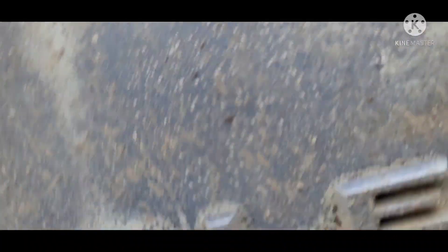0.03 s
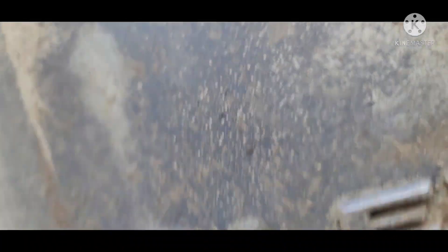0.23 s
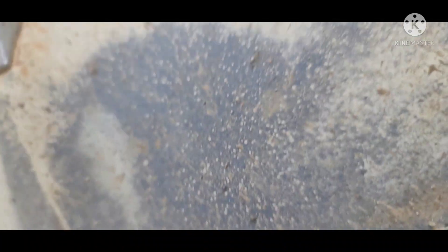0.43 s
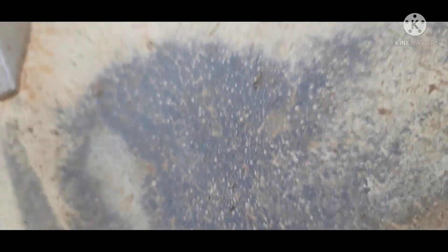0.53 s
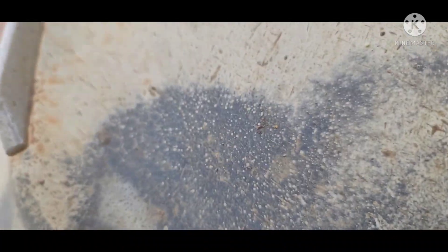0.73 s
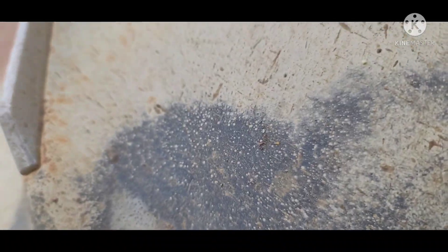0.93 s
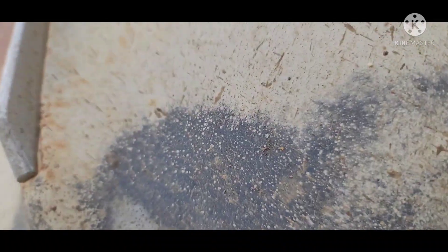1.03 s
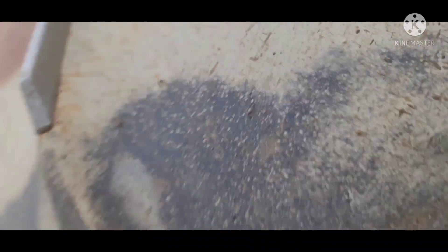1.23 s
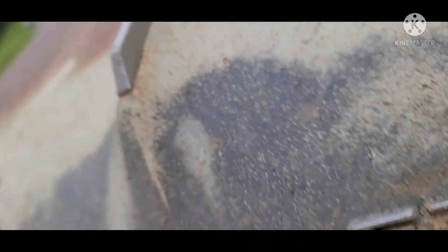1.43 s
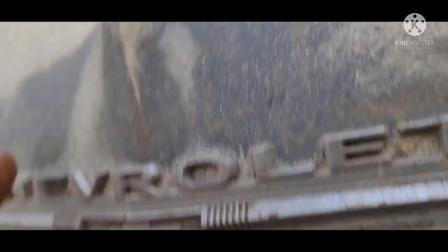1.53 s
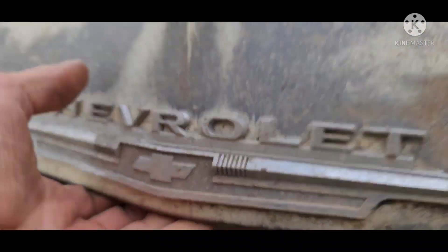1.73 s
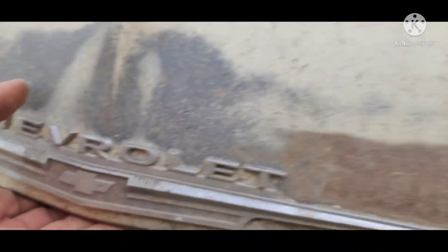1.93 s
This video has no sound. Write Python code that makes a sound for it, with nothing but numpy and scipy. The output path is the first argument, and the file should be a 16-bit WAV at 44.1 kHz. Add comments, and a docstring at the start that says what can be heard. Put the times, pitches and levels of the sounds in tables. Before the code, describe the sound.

An old truck hood is popped open: deep hollow panel boom with a brief dry squeak, a sharp catch snap midway, then scrapes and a cluster of clattering clicks, close to a stereo microphone in a hard-walled yard.

```python
"""An old truck's steel hood is popped open, close to the microphones, in a hard-walled yard.
Blows set the panel booming with decaying modes, dying noise and a dull thump.
The dry latch squeaks as a noisy stick-slip tone, and the catch snaps back with a crack and a ring.
Then the metal scrapes and rattles, in shaped noise bursts, as the hood is taken by its front edge.
Contacts ring a bracket and echo in the yard, over quiet air and a thin whine."""
import sys
import numpy as np
from scipy import signal
from scipy.fft import rfft, irfft, next_fast_len
from scipy.io import wavfile

SR = 44100
rng = np.random.default_rng(int(sys.argv[2]) if len(sys.argv) > 2 else 0)


def persist_wave(psi):
    """Save psi, clipped to +-1, as 16-bit WAV."""
    counts = np.round(np.clip(psi, -1, 1) * 32767).astype(np.int16)
    wavfile.write(sys.argv[1], SR, np.atleast_2d(counts).T)


N = 88200  # two seconds of samples

# Blows that shake the hood. Each row: start in seconds, shudder, panel boom and thump levels in dB,
# treble tilt of the shudder in dB per octave above 150 Hz.
HOOD_BLOWS = [(0.077, -44, -55.5, -38, 2), (.155, -20.5, -27.5, -16, 0.5), (.192, -26, -26.5, -13.5, -.5),
              (.226, -27, -25, -12, 0.5), (.315, -34, -26.5, -23, -1.5), (.408, -34.5, -29, -51, -2.5),
              (0.835, -34.5, -46, -56, 0.5), (1.035, -55, -46, -58, -3), (1.089, -51, -52, -36, 1.5),
              (1.266, -39, -47, -54, 2), (1.305, -43, -35.5, -52, 4), (1.360, -32, -31.5, -38, 0.5),
              (1.396, -36, -40, -47, 1), (1.535, -39, -40.5, -35, -1), (1.605, -42, -39.5, -40, 0),
              (1.715, -42, -44, -37, -2), (1.885, -48, -49, -52, -7)]
# Boom of the hood panel. Each row: frequency in Hz, level in dB, t60 in seconds.
HOOD_MODES = [(41.5, -12.5, 0.41), (74.6, -9.5, 0.48), (105.56, -0.5, 0.6), (116.9, 2, 0.75),
              (136.34, -6.5, 0.93), (191, -10, 0.91), (211.4, -12.5, 1.45), (283.2, -11, 1.03),
              (375.2, -12, 0.91), (399, -12.5, 0.95), (472.5, -12.5, 0.93), (518.5, -12.5, 0.4),
              (564, -11.5, 1.06)]
# The hood's dense higher modes, heard as a shudder. Each row: frequency in Hz, relative dB per Hz.
SHUDDER_COLOUR = [(18, -45), (40, -14), (70, 0), (125, -2.5), (175, -8), (300, -8.5), (520, -11),
                  (800, -15), (1300, -20.5), (2500, -32), (5000, -42), (9000, -53), (16000, -52)]
# How fast the shudder dies. Each row: frequency in Hz, t60 in seconds.
SHUDDER_T60 = [(40, 0.97), (120, 1.75), (300, 1.21), (700, 1.17), (1500, 0.94), (4000, 0.88), (14000, 0.47)]
# Dull thump of the whole hood on its hinges. Each row: frequency in Hz, level in dB, t60 in seconds.
THUMP_MODES = [(47.7, -7.5, 0.14), (67.8, -4.5, 0.12), (195, -14, 0.085), (494, -13, 0.037)]
HOOD_RISE_S = 0.0091

# Knocks of the hood's front edge. Each row: start in seconds, level in dB.
EDGE_KNOCKS = [(.160, -21.5), (1.366, -32.5), (1.398, -27)]
# Ring of the front edge. Each row: frequency in Hz, level in dB, t60 in seconds.
EDGE_MODES = [(523, 0, 0.21), (592, -9.5, 0.21), (665, -4, 0.1), (834, -6, 0.2)]

# Stick-slip squeak of the latch. Each row: time in seconds, pitch in Hz, base level in dB.
SQUEAK_CURVE = [(.084, 1052, -59), (.099, 1010, -52), (.105, 962.5, -34.5), (.117, 981, -31.5),
                (.138, 966.5, -24), (.145, 963, -20.5), (.156, 946, -18.5), (.168, 923.6, -24),
                (.186, 926.7, -39.5), (.206, 949, -25), (.222, 920, -44)]
# Short chirp before the rattle. Each row: time in seconds, pitch in Hz, base level in dB.
CHIRP_CURVE = [(1.212, 2015, -66), (1.229, 2020, -40), (1.238, 2020, -44.5), (1.256, 2030, -45)]
# Strength of the squeak's harmonics. Each entry: level in dB, from the fundamental up.
SQUEAK_PARTIALS_DB = [7, -3, -13, -21, -33]
# Friction noise under the squeak. Each row: frequency in Hz, relative dB per Hz.
FRICTION_COLOUR = [(200, -34), (600, -18), (800, 2), (1100, 6), (1450, -6), (1850, -16), (2300, -13),
                   (2900, -5), (3400, -22), (3800, -23), (5000, -17), (14000, -30)]
FRICTION_DB = -19  # against the squeak's base level
PITCH_JITTER, LEVEL_FLUTTER = 0.014, 0.22  # rms, as fractions
BRIGHTENING = 0.22  # dB per dB of level, for each step up the harmonics
PHASE_SWAY, PHASE_BLUR = 0.22, 0.102  # rms radians: for every partial, and per step up the harmonics
SQUEAK_LEAD = 0.667  # lead at the left port, in cycles of the fundamental
BITE_AT_S, BITE_S, BITE_DB = 0.1438, 0.0045, 3.5  # the latch bites hardest; boost per harmonic step

# The catch snapping back. Two entries: start in seconds, level of its ring in dB.
CLUNK = (.8345, -25)
# Ring of the catch. Each row: frequency in Hz, level in dB, t60 in seconds.
CATCH_MODES = [(133.6, -3.5, 0.56), (306, -7.5, 0.48), (377.5, -10, 0.42), (704, -2.5, 0.21),
               (796, -5.5, 0.25), (1095, -5.5, 0.19), (1253, 1, 0.13), (1326, -5, 0.15), (1394, -11, 0.21),
               (1830, -10, 0.11), (1942, -2, 0.14), (2000, -8.5, 0.16), (2404, -15, 0.12), (3000, -10, .14)]
# Colour of the catch's crack. Each row: frequency in Hz, relative dB per Hz.
CRACK_COLOUR = [(60, 1), (300, -5.5), (800, -4.5), (1300, 5), (2000, -3.5), (3000, -6), (5500, -14.5),
                (8000, -16), (9800, -26.5), (13500, -20), (16000, -40)]
CRACK_DB, CRACK_T60_S = -16, 0.073
CATCH_LAG_S = 0.00018  # the ring is late at the right port

# Snaps of the latch spring. Each row: start in seconds, level in dB.
SPRING_SNAPS = [(.222, -21), (0.2513, -29), (0.282, -40), (.358, -28), (.376, -35), (1.306, -21),
                (1.314, -13)]
# Colour of the spring snaps. Each row: frequency in Hz, relative dB per Hz.
SPRING_COLOUR = [(500, -17), (3000, -5.5), (8000, -5), (9500, -8), (14000, 0)]
SPRING_T60_S = 0.014

# Latch parts clicking together. Each row: start in seconds, clank, ring and tick levels in dB.
CLICKS = [(0.142, -34, -36, -37.5), (0.162, -26, -54, -50), (0.181, -33, -34.5, -57),
          (0.221, -30, -26, -28), (0.359, -38, -38.5, -39.5), (0.4169, -38, -52.5, -52),
          (0.432, -35, -63.5, -48), (0.486, -36.5, -51, -79), (0.574, -44, -63, -62),
          (1.228, -35, -67, -70), (1.2633, -23.5, -27, -39), (1.3091, -30, -24.5, -13.5),
          (1.3591, -20.5, -41, -23.5), (1.3915, -24, -29, -18), (1.399, -21.5, -31.5, -32),
          (1.412, -24, -37, -49), (1.4617, -30.5, -32.5, -28), (1.527, -34, -37, -32.5),
          (1.5617, -36.5, -37.5, -30.5), (1.7843, -42, -50.5, -42)]
# Low, hard part of a click. Each row: frequency in Hz, relative dB per Hz.
CLANK_COLOUR = [(100, 6), (350, -0.5), (700, 2), (1000, 0), (1350, 3), (2000, -1), (3000, -12.5),
                (6000, -32), (16000, -60)]
# Bright part of a click. Each row: frequency in Hz, relative dB per Hz.
RING_COLOUR = [(300, -32), (1800, -2.5), (3100, 1.5), (4500, 0.5), (5800, -4.5), (7600, -2.5),
               (9000, -14.5), (16000, -27)]
# Thin top of a click, also the hiss of a scrape. Each row: frequency in Hz, relative dB per Hz.
TICK_COLOUR = [(1000, -31), (6000, -9.5), (7800, -0.5), (9600, -15.5), (10800, -3), (12200, -5.5),
               (14000, 1), (15200, -5), (16000, -22.5)]
# Thin steel rung by every click. Each row: frequency in Hz, dB against the ring level, t60 in seconds.
LEVER_MODES = [(1268, -16, .2), (1852, -14, 0.13), (2853, -13, 0.14), (3355, -16.5, 0.085),
               (6770, -19, 0.147), (7600, -12.5, 0.11)]
CLANK_T60_S, RING_T60_S, TICK_T60_S = 0.076, 0.069, 0.046
CONTACT_RISE_S, CHATTER = 0.0024, 0.48  # chatter is the grit of a burst
SNAP_GAIN, SNAP_S = 0.45, 0.0023  # extra gain of the harder start, and its decay

# Metal sliding on metal. Each row: start in seconds, length in seconds, rasp and hiss levels in dB.
SCRAPES = [(0.127, 0.07, -39, -50), (0.539, 0.084, -70, -66.5), (0.684, 0.058, -72, -55),
           (0.813, 0.044, -45.5, -65), (1.074, 0.068, -39, -40), (1.169, 0.043, -54, -57),
           (1.225, 0.08, -46, -53.5), (1.315, 0.2, -50, -56), (1.532, 0.063, -43, -51),
           (1.593, 0.25, -63.5, -62), (1.683, 0.035, -51, -50), (1.788, 0.058, -63.5, -79),
           (1.83, 0.13, -70, -74), (1.946, 0.091, -64, -64.5)]
# Colour of the rasp. Each row: frequency in Hz, relative dB per Hz.
RASP_COLOUR = [(150, -33), (550, 6.5), (1000, -2), (1700, -4.5), (3500, 1.5), (5500, -5), (7500, 0.5),
               (9500, -13), (16000, -42)]
SCRAPE_RISE_S, SCRAPE_FALL_S, SCRAPE_GRIT = 0.024, 0.013, 0.26

# Dense short resonances of the latch bracket. Each row: frequency in Hz, relative strength in dB.
BRACKET_COLOUR = [(200, -32), (600, -2.5), (1500, -1), (4000, 2.5), (8000, -3), (16000, -1.5)]
BRACKET_DB, BRACKET_T60_S = -1, 0.066  # level is against the direct contact

# How fast the yard echo dies. Each row: frequency in Hz, t60 in seconds.
YARD_T60 = [(100, 2.1), (1000, 0.1564), (2500, 0.4251), (5000, 0.0249), (9000, 0.2), (15000, 1.7)]
# Colour of the yard echo. Each row: frequency in Hz, relative strength in dB.
YARD_COLOUR = [(100, -10.5), (1000, 0), (2500, -11), (5000, -3.5), (9000, -18), (15000, -32)]
YARD_DB, YARD_RISE_S = -12, 0.028
SQUEAK_SEND_DB = -5.5  # how much squeak reaches the yard

# Colour of the outdoor air. Each row: frequency in Hz, relative dB per Hz.
AIR_COLOUR = [(18, -40), (40, -0.5), (130, 0), (400, -11.5), (1000, -18.5), (2000, -24), (4000, -32),
              (9000, -38), (15000, -40)]
# Slow swells of the whine. Each row: time in seconds, dB against the whine level.
WHINE_FADE = [(0, -3), (.63, -1.5), (.8, -9), (1.04, 1), (1.3, -20)]
AIR_DB, WHINE_HZ, WHINE_DB = -55.5, 2290, -69

# Likeness of noise at the two ports. Each row: frequency in Hz, likeness from 0 to 1.
LIKENESS = [(60, 0.68), (140, 0.98), (280, 0.19), (600, 0.37), (1100, 0.5), (2500, 0.066)]
# Balance of the microphone pair. Each row: frequency in Hz, left minus right in dB.
BALANCE_DB = [(50, -3.5), (130, 0), (280, -2), (600, -6.5), (1100, -1.5), (2200, -3), (4500, 1),
              (14000, -2.5)]
# Lag of the left port. Each row: frequency in Hz, lag in seconds.
PORT_LAG_S = [(120, -0.00027), (350, 0.00045)]
TOP_HZ = 15600  # upper band limit


def amp(db):
    """Turns decibels into gain."""
    return 10 ** (np.asarray(db) / 20)


def unit(x):
    """Scales to rms 1."""
    return x / np.sqrt(np.mean(x ** 2) + 1e-20)


def read(points, hz):
    """Reads a table on a log-frequency axis."""
    f, value = np.transpose(points)
    return np.interp(np.log(hz + 1), np.log(f + 1), value)


def clock(size):
    """Time in seconds of each sample."""
    return np.arange(size) / SR


def rise(t, rise_s):
    """Straight ramp up to full level."""
    return np.minimum(t / rise_s, 1)


def decay(t, t60):
    """Exponential fall of 60 dB in t60 seconds."""
    return np.exp(-np.log(1000) * t / t60)


def add(mix, s, sound):
    """Mixes a sound in at time s."""
    part = mix[:, max(round(s * SR), 0):][:, :sound.shape[-1]]
    part += sound[..., :part.shape[1]]


def waver(rate_hz, size):
    """Smooth random movement of rms 1, with little motion faster than rate_hz."""
    hz = np.fft.rfftfreq(size, 1 / SR)
    smooth = rfft(rng.standard_normal(size)) / (1 + (hz / rate_hz) ** 4)
    return unit(irfft(smooth, size))


def noise(spectrum, size, tilt_db=0, grit=0):
    """Coloured noise at both ports, partly alike; grit clumps it into tiny contacts."""
    hz = np.fft.rfftfreq(size, 1 / SR)
    clumps = np.exp(grit * waver(680, size))
    left, other = rfft(rng.standard_normal((2, size)) * clumps)
    same = np.clip(read(LIKENESS, hz), 0, 1)
    right = same * left + np.sqrt(1 - same ** 2) * other
    tilt = amp(tilt_db * np.log2(np.maximum(hz / 150, 1)))
    colour = unit(amp(read(spectrum, hz))) * tilt
    return irfft(np.array([left, right]) * colour, size) / irfft(left, size).std()


def dying(x, t60s):
    """Lets each band die at its own speed."""
    hz, t, bands = signal.stft(x, SR, nperseg=256)
    fall = amp(-60 * t / read(t60s, hz)[:, None])
    return signal.istft(bands * fall, SR, nperseg=256)[1][:, :x.shape[1]]


def modes(table, size):
    """A struck part rings as decaying sines, with alternating signs."""
    t = clock(size)
    ring = np.zeros(size)
    for k, (hz, db, t60) in enumerate(table):
        ring += (-1) ** k * amp(db) * decay(t, t60) * np.sin(2 * np.pi * hz * t)
    return ring


def burst(spectrum, t60):
    """A harder snap starts a chattering contact that dies quickly."""
    t = clock(8192)
    snap = 1 + SNAP_GAIN * np.exp(-t / SNAP_S)
    shape = rise(t, CONTACT_RISE_S) * snap * decay(t, t60)
    return noise(spectrum, size=len(t), grit=CHATTER) * shape


def hood():
    """Each blow pushes the big panel and sets it booming and shuddering."""
    out, t = np.zeros((2, N)), clock(65536)
    boom = modes(HOOD_MODES, size=len(t))
    thump = modes(THUMP_MODES, size=len(t))
    for s, shudder_db, boom_db, thump_db, tilt_db in HOOD_BLOWS:
        shudder = dying(noise(SHUDDER_COLOUR, size=len(t), tilt_db=tilt_db), SHUDDER_T60)
        blow = amp(shudder_db) * shudder + amp(boom_db) * boom + amp(thump_db) * thump
        add(out, s, rise(t, HOOD_RISE_S) * blow)
    return out


def knocks():
    """The hood's front edge knocks on the latch with a hollow clang."""
    out = np.zeros((2, N))
    clang = rise(clock(SR), CONTACT_RISE_S) * modes(EDGE_MODES, size=SR)
    for s, db in EDGE_KNOCKS:
        add(out, s, amp(db) * clang)
    return out


def squeak(curve, partials_db):
    """Stick-slip tone over friction noise; it brightens with force and its partials are unsteady."""
    s, hz, db = np.transpose(curve)
    t = s[0] + clock(8192)
    size = len(t)

    def both(rate_hz):
        """Separate wavering for each port."""
        return np.array([waver(rate_hz, size), waver(rate_hz, size)])

    pitch = np.interp(t, s, hz) * (1 + PITCH_JITTER * waver(134, size))
    turns = np.cumsum(pitch) / SR + np.array([[SQUEAK_LEAD], [0]])
    bite_db = BITE_DB * np.exp(-((t - BITE_AT_S) / BITE_S) ** 2)
    level_db = np.interp(t, s, db, right=-120)
    tone = np.zeros((2, size))
    for k, part_db in enumerate(partials_db):
        bright_db = BRIGHTENING * k * (level_db - db.max())
        even_db = k % 2 * k * bite_db  # only even harmonics jump out at the bite
        flutter = 1 + LEVEL_FLUTTER * both(rate_hz=180)
        unsteady = PHASE_SWAY * both(rate_hz=29.0) + PHASE_BLUR * k * both(rate_hz=140)
        wave = np.sin(2 * np.pi * (k + 1) * turns + unsteady)
        tone += amp(part_db + even_db + bright_db) * flutter * wave
    friction = amp(FRICTION_DB) * noise(FRICTION_COLOUR, size)
    out = np.zeros((2, N))
    add(out, s[0], amp(level_db) * (np.sqrt(2) * tone + friction))
    return out


def catch():
    """The sprung catch slams on its stop: a noisy crack, and the modes of its ring."""
    crack, ring = np.zeros((2, N)), np.zeros((2, N))
    s, db = CLUNK
    add(ring, s, amp(db) * rise(clock(SR), CONTACT_RISE_S) * modes(CATCH_MODES, size=SR))
    add(crack, s, amp(CRACK_DB) * burst(CRACK_COLOUR, CRACK_T60_S))
    late_right = np.roll(ring[1], round(CATCH_LAG_S * SR))
    return crack, np.array([ring[0], late_right])


def snaps():
    """The latch spring gives tiny dry snaps of bright noise."""
    out = np.zeros((2, N))
    for s, db in SPRING_SNAPS:
        add(out, s, amp(db) * burst(SPRING_COLOUR, SPRING_T60_S))
    return out


def clicks():
    """Loose latch parts knock together in three noise bands and ring thin steel."""
    out, lever = np.zeros((2, N)), modes(LEVER_MODES, size=SR // 2)
    for s, clank_db, ring_db, tick_db in CLICKS:
        add(out, s, amp(clank_db) * burst(CLANK_COLOUR, CLANK_T60_S))
        add(out, s, amp(ring_db) * burst(RING_COLOUR, RING_T60_S))
        add(out, s, amp(tick_db) * burst(TICK_COLOUR, TICK_T60_S))
        add(out, s, amp(ring_db) * lever)
    return out


def scrapes():
    """Dusty metal slides in short gritty strokes of rasp and hiss."""
    out, t = np.zeros((2, N)), clock(16384)
    for s, length, rasp_db, hiss_db in SCRAPES:
        after = np.maximum(t - length + SCRAPE_FALL_S, 0)  # time since the stroke began to fade
        stroke = rise(t, SCRAPE_RISE_S) * np.exp(-after / SCRAPE_FALL_S)
        rasp = amp(rasp_db) * noise(RASP_COLOUR, size=len(t), grit=SCRAPE_GRIT)
        hiss = amp(hiss_db) * noise(TICK_COLOUR, size=len(t), grit=SCRAPE_GRIT)
        add(out, s, stroke * (rasp + hiss))
    return out


def bracket(x):
    """Contacts ring the bracket's many close resonances, modelled as a dying noise response."""
    t = clock(4096)
    ring = noise(BRACKET_COLOUR, size=len(t)) * decay(t, BRACKET_T60_S)
    rung = signal.oaconvolve(x, ring / np.linalg.norm(ring[0]), axes=1)[:, :N]
    return (x + amp(BRACKET_DB) * rung) / np.hypot(1, amp(BRACKET_DB))


def yard(x):
    """Walls and engine bay return a diffuse echo that swells in, then dies band by band."""
    tail = dying(noise(YARD_COLOUR, size=SR), YARD_T60) * rise(clock(SR), YARD_RISE_S)
    echo = signal.fftconvolve(x, tail / np.linalg.norm(tail[0]), axes=1)[:, :N]
    return amp(YARD_DB) * echo


def background():
    """Quiet outdoor air as shaped noise, with a thin whine of wavering pitch."""
    turns = np.cumsum(WHINE_HZ * (1 + 0.0081 * waver(62, size=N))) / SR
    fade_db = np.interp(clock(N), *np.transpose(WHINE_FADE))
    whine = amp(WHINE_DB + fade_db) * np.sin(2 * np.pi * turns)
    return amp(AIR_DB) * noise(AIR_COLOUR, size=N) + whine


def scene():
    """Brings hood, latch, yard and air together."""
    squeaks = squeak(SQUEAK_CURVE, SQUEAK_PARTIALS_DB)
    squeaks += squeak(CHIRP_CURVE, SQUEAK_PARTIALS_DB[:1])  # the chirp is a single partial
    crack, ring = catch()
    metal = bracket(crack + clicks() + scrapes())
    echo = yard(metal + amp(SQUEAK_SEND_DB) * squeaks)
    return hood() + knocks() + squeaks + metal + ring + snaps() + echo + background()


def record(dry):
    """Two spaced ports differ in level and arrival time, then the top is cut."""
    size = next_fast_len(N + 4096, True)  # spare room for the lag
    hz = np.fft.rfftfreq(size, 1 / SR)
    half_db = read(BALANCE_DB, hz) / 2
    lag = np.exp(-2j * np.pi * hz * read(PORT_LAG_S, hz))
    ports = np.array([amp(half_db) * lag, amp(-half_db)])
    heard = irfft(rfft(dry, size) * ports, size)[:, :N]
    lowpass = signal.firwin(255, TOP_HZ, window=("kaiser", 9), fs=SR)
    return signal.oaconvolve(heard, lowpass[None], "same")


dry = scene()
out = record(dry)
persist_wave(out)
```